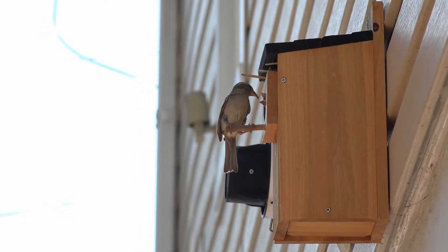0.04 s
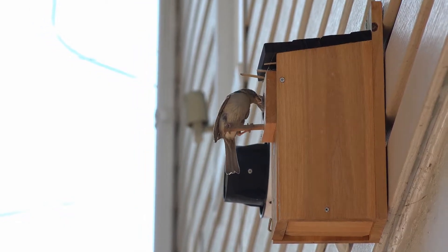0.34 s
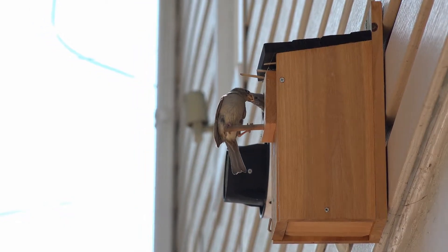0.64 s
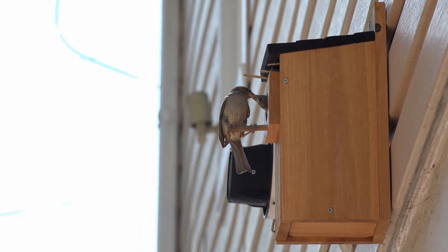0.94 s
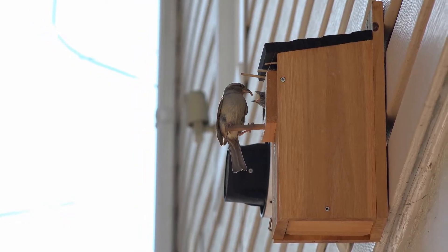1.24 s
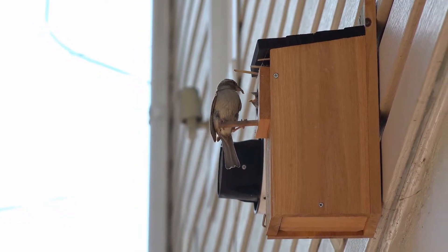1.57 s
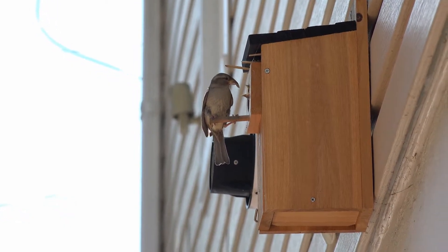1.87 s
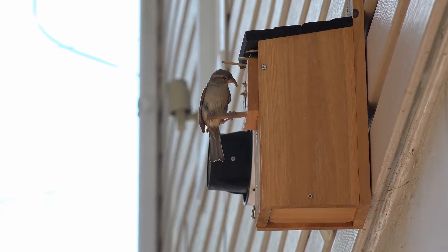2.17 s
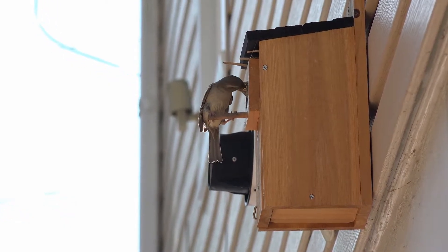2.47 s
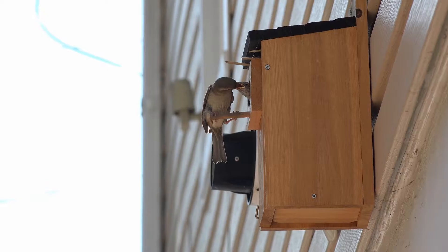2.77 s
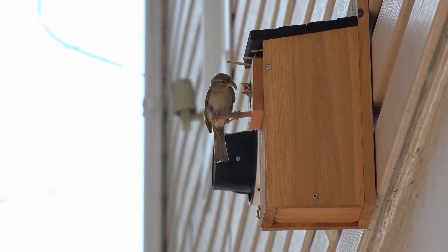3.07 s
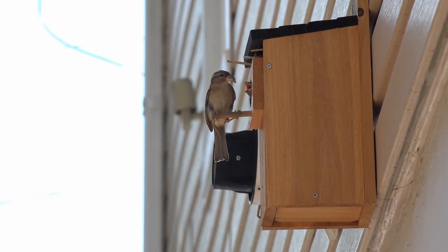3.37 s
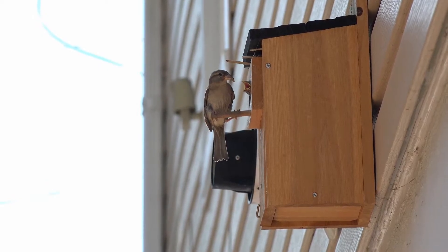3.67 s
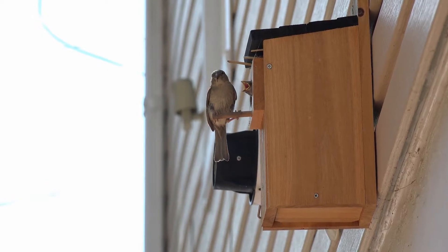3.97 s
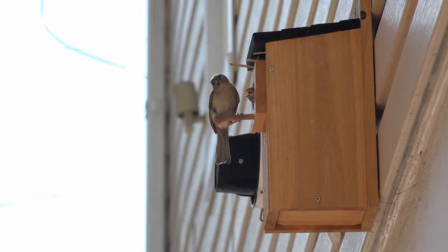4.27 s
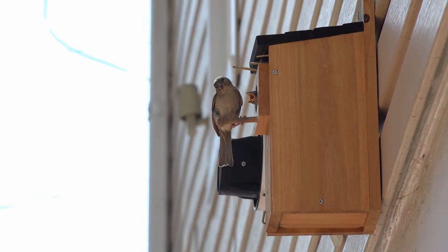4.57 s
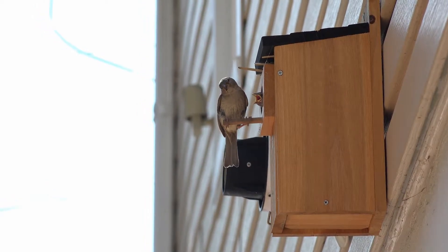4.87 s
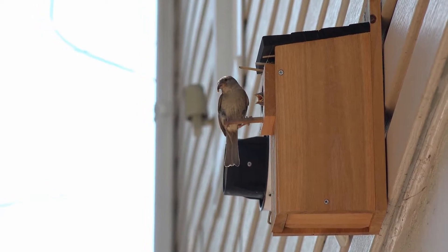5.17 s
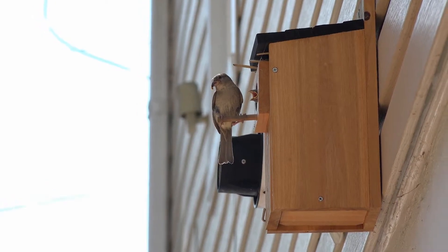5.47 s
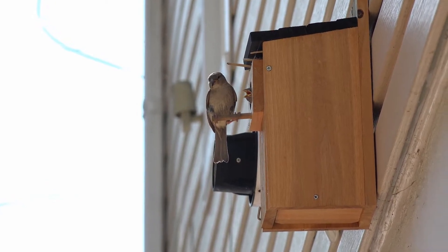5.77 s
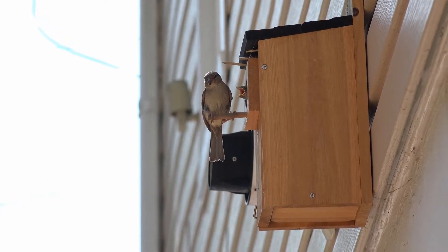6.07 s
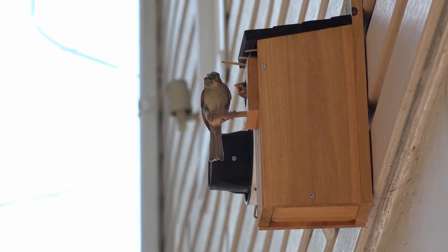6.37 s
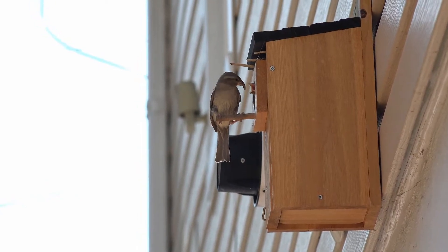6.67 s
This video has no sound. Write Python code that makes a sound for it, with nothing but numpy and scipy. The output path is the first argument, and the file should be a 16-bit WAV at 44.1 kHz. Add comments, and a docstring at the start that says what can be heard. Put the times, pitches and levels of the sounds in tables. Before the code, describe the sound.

A sparrow on a nest box chirps about twice a second, each call a quick rasp, a loud whistle and a short upsweep with a slight echo from the eaves. Another sparrow answers softly from farther off, more often in the second half. A brief dry scuff and thin peeps come near the start. Distant traffic and a faint machine tone lie underneath, and light wind rumbles on the microphone.

```python
"""A sparrow chirps from the perch of a nest box under a slatted roof; another answers from farther off.
Vibrating membranes in the syrinx voice each chirp: a falling rasp, a loud arched whistle and a short upsweep,
echoed by the wall and the eaves. Behind them are distant traffic, a faint machine whine that stops with a relay
click, two thin peeps from other birds and a little wind on the microphone."""
import sys
import numpy as np
from scipy import signal
from scipy.fft import rfft, irfft, next_fast_len
from scipy.io import wavfile
from scipy.ndimage import map_coordinates

SR = 44100
rng = np.random.default_rng(int(sys.argv[2]) if len(sys.argv) > 2 else 0)


def to_wav(sig):
    """Store sig (one row per channel, or 1-D mono) as 16-bit WAV at the path in sys.argv[1].

    Samples outside -1..1 are clipped; the rate is SR.
    """
    pcm = np.clip(np.atleast_2d(sig), -1, 1) * 32767
    pcm = np.round(pcm).astype(np.int16)
    wavfile.write(sys.argv[1], SR, pcm.T)  # frames by channels


N = 296793


def amp(db):
    """Decibels to gain."""
    return 10 ** (np.asarray(db) / 20)


def unit(x):
    """Scale to rms 1."""
    return x / np.sqrt(np.mean(x ** 2) + 1e-20)


def along(points, hz):
    """Read (freq_hz, value) points on a log frequency axis."""
    freqs, values = np.transpose(points)
    return np.interp(np.log(hz + 1), np.log(freqs + 1), values)


def curves(rows):
    """One automation curve for each column after the time."""
    times, *columns = np.transpose(rows)
    return [np.interp(np.arange(N) / SR, times, column) for column in columns]


def wobble(rate, n):
    """A smooth random curve of n samples, with rate knots a second."""
    knots = rng.standard_normal(int(n * rate / SR) + 4)
    return map_coordinates(knots, [np.arange(n) * rate / SR])


def cycle(hz):
    """Running phase of a changing frequency, from a random start."""
    return 2 * np.pi * (np.cumsum(hz) / SR + rng.random())


def filtered(x, response):
    """Shape x with a frequency response."""
    n = x.shape[-1]
    padded = next_fast_len(n + SR // 20)
    return irfft(rfft(x, padded) * response(np.fft.rfftfreq(padded, 1 / SR)), padded)[..., :n]


def noise(spectrum, n):
    """Coloured noise of rms 1."""
    return unit(filtered(rng.standard_normal(n), lambda hz: amp(along(spectrum, hz))))


def wide(spectrum, side_db):
    """Stereo noise, with the side at side_db relative to the mid."""
    mid, side = noise(spectrum, N), amp(side_db) * noise(spectrum, N)
    return np.array([mid + side, mid - side])


def add(track, start_s, x):
    """Mix x into the track, trimming what overhangs either end."""
    i = round(start_s * SR)
    x = x[:, max(-i, 0):max(N - i, 0)]
    track[:, max(i, 0):max(i, 0) + x.shape[1]] += x


def drone(hz, db, waver_hz, flicker_db, side_db):
    """A far tone that wavers and fades on its way through the air."""
    phase = cycle(hz + waver_hz * wobble(14, N))
    mid = np.sin(phase) * amp(flicker_db * wobble(9, N))
    side = amp(side_db) * wobble(6, N) * np.cos(phase)
    return np.sqrt(2) * amp(db) * np.array([mid + side, mid - side])


# Fader ride of the tyre rush: time_s, gain_db
TYRE_RIDE = [(0.0, -44), (1.74, -46), (1.97, -48), (2.64, -49), (6.58, -48), (6.73, -47)]
# Colour of the tyre rush: freq_hz, gain_db
TYRE_EQ = [(30, -8.5), (70, 1), (130, 2), (200, -1), (330, -4.5), (500, -7.5), (800, -7.5), (1250, -9),
           (1600, -15.5), (2200, -18), (4000, -31)]
# Colour of the background hiss: freq_hz, gain_db
HISS_EQ = [(300, 12), (2000, -4), (4300, 2), (7000, -2), (10000, -12), (12500, -20), (15000, -42),
           (16000, -55)]

def street(boost_db=4, hiss_db=-56):
    """Tyres rush on a distant road, over a faint, wide hiss."""
    ride_db, = curves(TYRE_RIDE)
    rush = amp(ride_db + boost_db + .64 * wobble(7, N)) * wide(TYRE_EQ, side_db=-8.5)
    return rush + amp(hiss_db) * wide(HISS_EQ, side_db=5)


# Two engines speeding up and easing off: time_s, pitch_hz, level_db
LOW_ENGINE = [(0, 118, -51), (1.3, 120, -50), (2.2, 124, -46.5), (3.9, 124, -50), (4.5, 126, -45),
              (5.2, 129, -47), (5.9, 138, -39.5), (6.4, 138, -39), (6.73, 141, -44)]
HIGH_ENGINE = [(0, 135, -55), (.7, 138, -49), (1.8, 155, -45), (2.1, 153, -54), (3.5, 149, -52),
               (4.3, 130, -68)]
# Brief far hums: peak_s, pitch_hz, level_db
PASSING_HUMS = [(3.75, 390, -52), (5.65, 244, -44)]

def engines(swell_s=.13, pitch_sag=.025, loss_db_per_doubling=10):
    """Two engines drone far away; hums swell, sag in pitch and fade like passing motors."""
    voices = [curves(LOW_ENGINE), curves(HIGH_ENGINE)]
    for peak_s, hz, db in PASSING_HUMS:
        position = (np.arange(N) / SR - peak_s) / swell_s
        distance = np.hypot(1, position)
        pitch = hz * (1 - pitch_sag * position / distance)
        voices.append((pitch, db - loss_db_per_doubling * np.log2(distance)))
    return sum(drone(hz, db, waver_hz=1.5, flicker_db=1.8, side_db=-10) for hz, db in voices)


# Partials of the machine whine: pitch_hz, level_db
WHINE_PARTIALS = [(1174, -62), (1292, -56), (1351, -48.5), (1410, -49.5)]
# Fader ride of the thin tone: time_s, level_db
TONE_RIDE = [(0, -65), (1.8, -63), (2.5, -58), (3.6, -58), (5.5, -67), (6.73, -60)]

def machine(stop_s=.35, fade_db_per_s=85, tone_hz=1233):
    """A machine whine dies away early; a thin tone carries on throughout."""
    fade_db = fade_db_per_s * np.maximum(np.arange(N) / SR - stop_s, 0)
    whine = sum(drone(hz, db - fade_db, waver_hz=3, flicker_db=.5, side_db=-14)
                for hz, db in WHINE_PARTIALS)
    tone_db, = curves(TONE_RIDE)
    return whine + drone(tone_hz, tone_db, waver_hz=2.5, flicker_db=2.5, side_db=-10)


# Colour of the wind rumble: freq_hz, gain_db
WIND_EQ = [(15, -4), (35, 0), (70, -8), (130, -8.5), (300, -49), (900, -61)]
# Puffs of wind: peak_s, length_s, level_db, lean_left_db
WIND_PUFFS = [(2.8, .2, -36.5, 2), (3.6, .25, -44, 0), (4.11, .09, -42, 1), (4.55, .11, -35, 2),
              (4.82, .25, -39.5, 4.5), (5.27, .3, -43, 1.5), (5.51, .1, -36, 2.5)]

def wind(breeze_db=-53.3, flutter_db=1.5):
    """A light breeze rumbles on the microphone, its puffs leaning left."""
    t = np.arange(N) / SR
    power = amp(breeze_db) ** 2
    for peak_s, length_s, db, left_db in WIND_PUFFS:
        swell = np.exp(-(2 * (t - peak_s) / length_s) ** 2)
        power = power + amp([[db + left_db], [db - left_db]]) ** 2 * swell
    rumble = wide(WIND_EQ, side_db=-3)
    return np.sqrt(power) * amp(flutter_db * wobble(12, N)) * rumble


# Reverb time under the roof: freq_hz, t60_s
EAVES_DECAY = [(2000, .42), (3300, .38), (4500, 0.45), (6000, 0.3), (10000, 0.26), (15000, 0.19)]

def eaves(x, echo_db, near_db=-3, near_s=.014, wall_db=-10, wall_s=.03, tail_db=-2):
    """Direct sound, quick reflections off box, slats and wall, and a diffuse tail."""
    hz, t, bands = signal.stft(rng.standard_normal((2, SR // 2)), SR, nperseg=256)
    decay = amp(-60 * t / along(EAVES_DECAY, hz)[:, None])
    build_up = 1 - np.exp(-t / .006)
    _, tail = signal.istft(bands * decay * build_up, SR, nperseg=256)
    room = amp(tail_db) * tail / np.linalg.norm(tail[0])
    delay_s, taps = rng.uniform(.001, near_s, size=(2, 9)), rng.standard_normal((2, 9))
    taps /= np.linalg.norm(taps, axis=1, keepdims=True)
    for ear in range(2):
        room[ear, (delay_s[ear] * SR).astype(int)] += amp(near_db) * taps[ear]
        room[ear, ((wall_s + delay_s[ear] / 2) * SR).astype(int)] += amp(wall_db) * taps[ear]
    room *= amp(echo_db)
    room[:, 0] += 1  # direct sound
    heard = signal.fftconvolve(x[None], room, axes=1)
    # each ear keeps the energy of the dry sound
    return heard * np.linalg.norm(x) / np.linalg.norm(heard, axis=1, keepdims=True)


def relay_click(start_s=.347, gain_db=-37, attack_s=.002, decay_s=.028):
    """A brief dry click as a relay switches the machine off."""
    out, t = np.zeros((2, N)), np.arange(SR // 8) / SR
    scrape = noise([(500, -10), (2500, 0), (9000, -1), (15000, -3)], len(t))
    stroke = (1 - np.exp(-t / attack_s)) * np.exp(-t / decay_s)
    add(out, start_s, eaves(amp(gain_db) * stroke * scrape, echo_db=-6))
    return out


def syrinx(pitch, jitter, trill_hz, trill_depth, tremor):
    """Phase and strength of a vibrating membrane with a fast, uneven trill."""
    n = len(pitch)
    trill = np.sin(cycle(trill_hz * (1 + .2 * wobble(80.3, n))))
    bend = 1 + trill_depth * trill + jitter * wobble(913.3, n)
    return cycle(pitch * bend), 1 + tremor * trill


# Notes of other small birds: start_s, from_hz, to_hz, length_s, gain_db
PEEPS = [(0.263, 5030, 5540, 0.0169, -50), (0.591, 6200, 6470, 0.018, -34.5)]

def peeps():
    """Small birds nearby give short, thin, rising notes."""
    out = np.zeros((2, N))
    for start_s, from_hz, to_hz, length_s, db in PEEPS:
        n = int(length_s * SR)
        pitch = np.linspace(from_hz, to_hz, n)
        phase, strength = syrinx(pitch, jitter=.025, trill_hz=200, trill_depth=.01, tremor=.2)
        add(out, start_s, eaves(2 * amp(db) * np.hanning(n) * strength * np.sin(phase), echo_db=-9))
    return out


REST_HZ, USUAL_DB = 3120, -15  # the sparrow's resting pitch and usual whistle gain
LEAP_S, DROP_S = .0033, .004  # time constants of the whistle's rise and fall
SOFT_SAG = .11  # share of pitch that rasp and upsweep lose at zero effort


def envelope(attack_s, hold_s, release_s):
    """Time and loudness of one syllable."""
    corners = np.cumsum([0, attack_s, hold_s, release_s])
    t = np.arange(0, corners[-1], 1 / SR)
    return t, np.interp(t, corners, [0, 1, 1, 0])


# Colour of the breath in all three syllables: freq_hz, gain_db
BREATH_EQ = [(2000, -32), (2700, -11), (3200, 4), (5000, 3), (6900, -2.5), (7800, 1.5), (9800, 3),
             (11000, -10), (13000, -14), (14700, -18), (16000, -24)]

def rasp(whistle_db, effort, bright_db, from_hz=6850, to_hz=5750, base_db=-34, octave_db=-22, air_db=-1):
    """Opening syllable: the high voice slides down roughly, and a broad hiss swells with it."""
    t, ramp = envelope(attack_s=.075 * np.sqrt(effort), hold_s=.024, release_s=.016)
    loud, softness = ramp ** 1.2, 1 - effort
    pitch = np.linspace(from_hz, to_hz, len(t)) * (1 - SOFT_SAG * softness)
    phase, strength = syrinx(pitch, jitter=.058, trill_hz=380, trill_depth=.025, tremor=.5)
    voice = np.sqrt(2) * (np.sin(phase) + amp(octave_db) * np.sin(2 * phase))
    hiss = amp(air_db) * loud ** 1.05 * noise(BREATH_EQ, len(t))
    gain_db = base_db + .5 * (whistle_db - USUAL_DB) - 7 * softness + .6 * bright_db
    return amp(gain_db) * strength * (loud * voice + hiss)


# Colour of the breaking voice, in grate and upsweep: freq_hz, gain_db
GRATE_EQ = [(1800, -38), (2400, -6), (2850, -4), (3250, 7), (4300, 3.5), (5400, 1.5), (6300, -11),
            (7500, -13), (9700, -14), (11800, -13), (14000, -19), (16000, -40)]

def grate(effort, length_s=.085, gain_db=-20):
    """The whistle breaks into grating noise as it drops, more so in a soft call."""
    n = int(length_s * SR)
    burst = noise(GRATE_EQ, n) * np.hanning(n) * amp(wobble(360, n))
    return amp(gain_db) / effort * burst


def upsweep(whistle_db, effort, overtone_db, climb_s=.05, third_db=-19, air_db=-22, husk_db=-11):
    """Closing syllable: climbs huskily from the bottom of the voice and clears as it rises."""
    t, loud = envelope(attack_s=.044, hold_s=.012, release_s=.016)
    n = len(t)
    top_hz = 4370 + 18 * (whistle_db - USUAL_DB)  # a louder chirp climbs higher
    climb = np.sin(np.pi / 2 * (t / climb_s) ** 1.3) ** 2
    pitch = (REST_HZ + (top_hz - REST_HZ) * climb) * (1 - SOFT_SAG * (1 - effort))
    phase, strength = syrinx(pitch, jitter=.036, trill_hz=260, trill_depth=.02, tremor=.55)
    overtones = np.sin(2 * phase) + amp(third_db) * np.sin(3 * phase)
    husk = amp(air_db) * noise(BREATH_EQ, n) + amp(husk_db) * noise(GRATE_EQ, n)
    harshness = np.linspace(2, .2, n)
    return loud * strength * (np.sin(phase) + harshness * (amp(overtone_db) * overtones + husk))


def whistle(murmur_s, length_s, top_hz, effort, bright_db, octave_db=-18.5, twelfth_db=-31, air_db=-29):
    """Main syllable: leaps from a low murmur, flutters at the top and drops back."""
    t, gate = envelope(attack_s=murmur_s, hold_s=length_s, release_s=.02)
    t = t - murmur_s  # zero at the leap
    n, softness, span_hz = len(t), 1 - effort, top_hz - REST_HZ
    arch = 1 / (1 + np.exp(-t / LEAP_S)) / (1 + np.exp((t - length_s) / DROP_S))
    pitch = (REST_HZ + span_hz * arch) * (1 + .01 * wobble(70, n))
    loud = amp(.0125 * span_hz * (arch - 1))  # the higher, the louder
    # a soft call keeps more of its level as it slurs down, and its voice keeps breaking
    loud = gate * np.where(t > length_s / 2, loud ** effort, loud)
    breaks = unit(amp((.5 + 6 * softness) * wobble(168.4, n)))
    jitter = .015 + .036 * (1 - loud) + .008 * softness
    phase, strength = syrinx(pitch, jitter, trill_hz=165, trill_depth=.017, tremor=.5)
    # the octave stays strong on the flanks; the twelfth sounds only at the top
    octave = amp(octave_db) * loud ** .35 * np.sin(2 * phase + .8 * wobble(1100, n))
    twelfth = amp(twelfth_db) * loud ** 1.5 * np.sin(3 * phase + wobble(1500, n))
    air = amp(air_db) / effort * np.sqrt(loud) * noise(BREATH_EQ, n)
    voice = loud * np.sin(phase) + amp(bright_db - 6 * softness) * (octave + twelfth) + air
    return strength * breaks * voice


# Cue list of both sparrows; effort runs 0-1, and a low effort is a soft answer:
# leap_s, whistle_length_s, top_hz, whistle_db, effort, bright_db, upsweep_db, upsweep_overtone_db
CHIRPS = [ (-.06, .05, 4800, -14, 1, -4, -25, -10), (.47, .055, 4780, -15.5, .92, -1.5, -29.5, -5),
          (1.046, .06, 4950, -26, .6, 2, -28.5, -15), (1.581, .047, 4770, -14.5, 1, -2, -24.5, -17),
          (2.121, .049, 4820, -15, 1, 1.5, -26, -9), (2.668, .049, 4800, -15.5, .85, -1, -21, -25),
          (2.795, .055, 4700, -30, .4, 0, -32, -28), (3.332, .05, 4860, -12, 1, 3, -22.5, -11),
          (3.41, .055, 4700, -31, .45, 0, -32, -22), (3.784, .064, 4740, -32.5, .35, -3, -33.5, -30),
          (3.951, .043, 4300, -35.5, .35, -6, -37, -32), (4.349, .051, 4800, -10.5, 1, 0, -21.5, -18),
          (4.787, .065, 4720, -34, .3, -3, -33, -26), (5.038, .046, 4830, -10.5, 1, -2, -20.5, -22),
          (5.398, .066, 4720, -30.5, .4, -2, -32, -30), (5.772, .05, 4830, -12.5, 1, .5, -22.5, -14),
          (5.993, .054, 4700, -30, .35, -2, -32, -30), (6.389, .049, 4890, -10, 1, 3, -20.5, -11),
          (6.622, .064, 4700, -29.5, .45, -2, -33, -28)]

def sparrows(murmur_s=.045, pause_s=.032):
    """Each chirp rasps into its whistle, pauses and sweeps up, echoing under the eaves."""
    out = np.zeros((2, N))
    for leap_s, _, _, db, effort, bright_db, _, _ in CHIRPS:
        opening = rasp(db, effort, bright_db)
        add(out, leap_s + LEAP_S - (len(opening) - 1) / SR, eaves(opening, echo_db=2.5))
    for leap_s, length_s, top_hz, db, effort, bright_db, _, _ in CHIRPS:
        echo_db = -1.3 + 5.5 * (1 - effort)  # soft calls are wetter
        note = amp(db) * whistle(murmur_s, length_s, top_hz, effort, bright_db)
        add(out, leap_s - murmur_s, eaves(note, echo_db))
        burst = amp(db) * grate(effort)
        centre_s = leap_s + length_s + .006  # just after the drop
        add(out, centre_s - len(burst) / SR / 2, eaves(burst, echo_db))
    for leap_s, length_s, _, db, effort, _, upsweep_db, overtone_db in CHIRPS:
        closing = amp(upsweep_db) * upsweep(db, effort, overtone_db)
        add(out, leap_s + length_s + pause_s * np.sqrt(effort), eaves(closing, echo_db=-1))
    return out


def scene(lean_left_db=.3, left_lag_s=.000016):
    """Birds in front, barely off centre, with the street behind."""
    sides = np.array([[1], [-1]])
    birds = (sparrows() + peeps()) * amp(lean_left_db * sides)
    birds = filtered(birds, lambda hz: np.exp(-1j * np.pi * hz * left_lag_s * sides))
    return birds + relay_click() + street() + machine() + engines() + wind()


def record(dry, cutoff_hz=15700):
    """A brick-wall low-pass takes off the highest treble."""
    return filtered(dry, lambda hz: hz < cutoff_hz)


dry = scene()
out = record(dry)
to_wav(out)
```